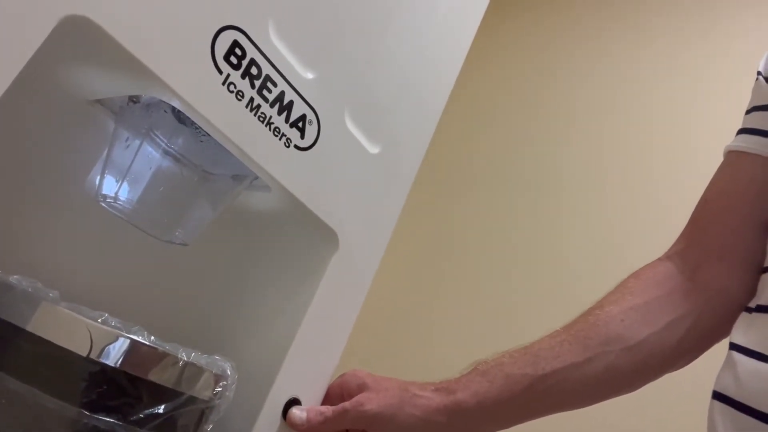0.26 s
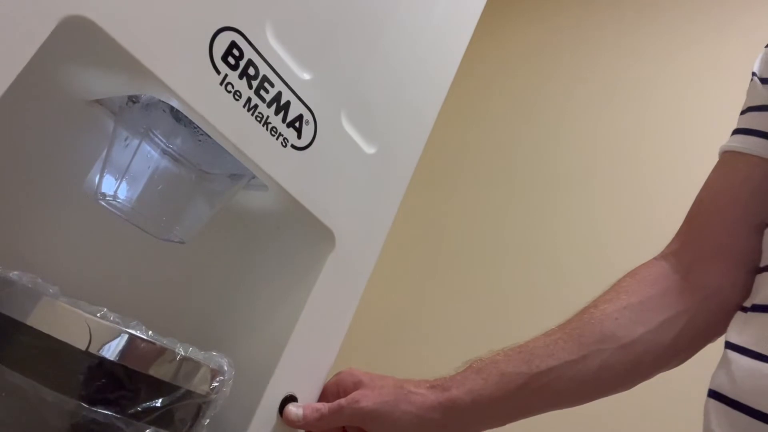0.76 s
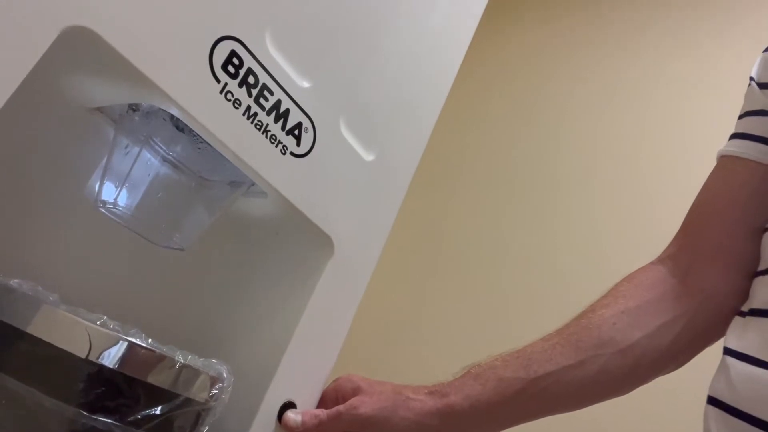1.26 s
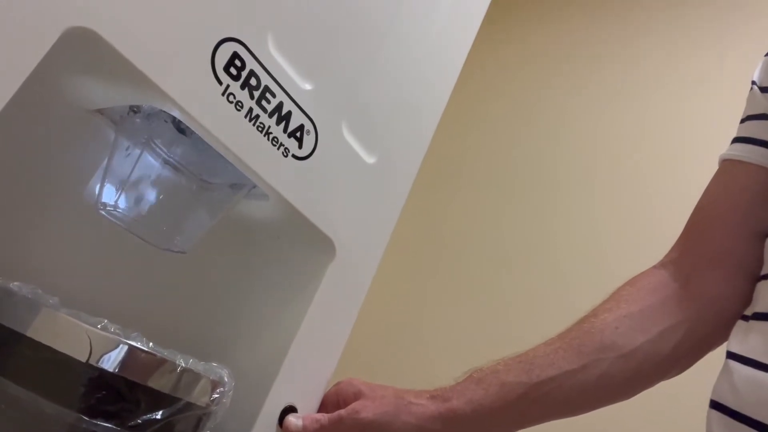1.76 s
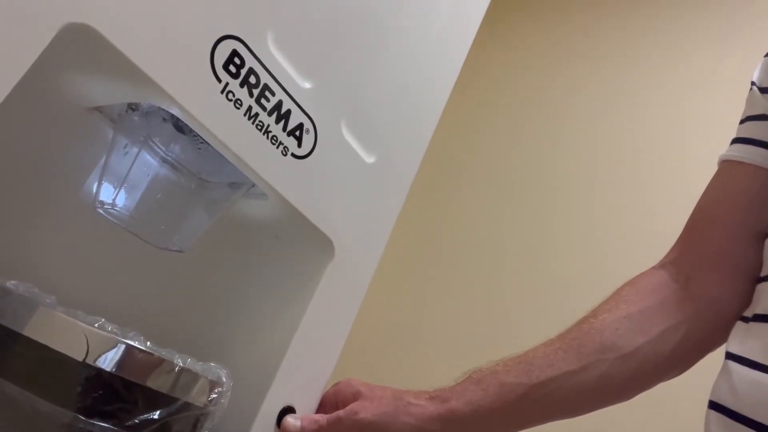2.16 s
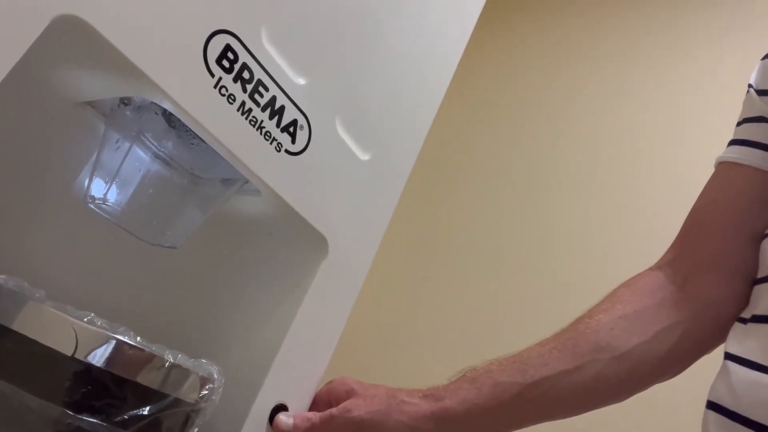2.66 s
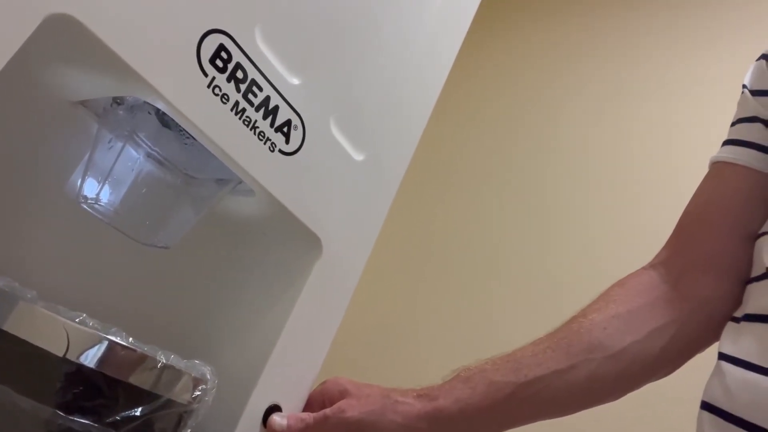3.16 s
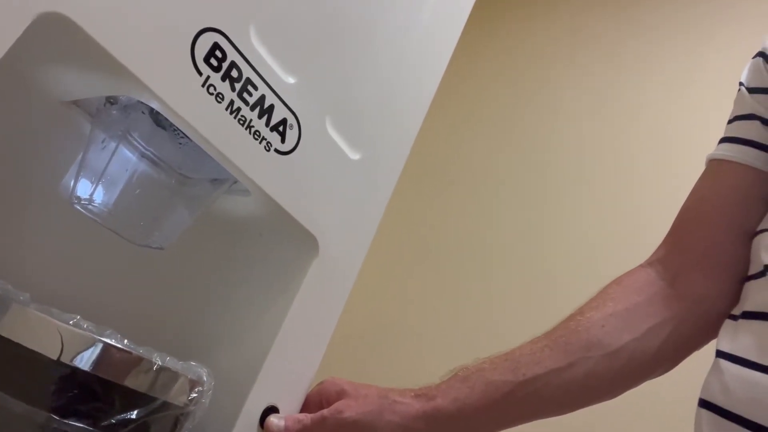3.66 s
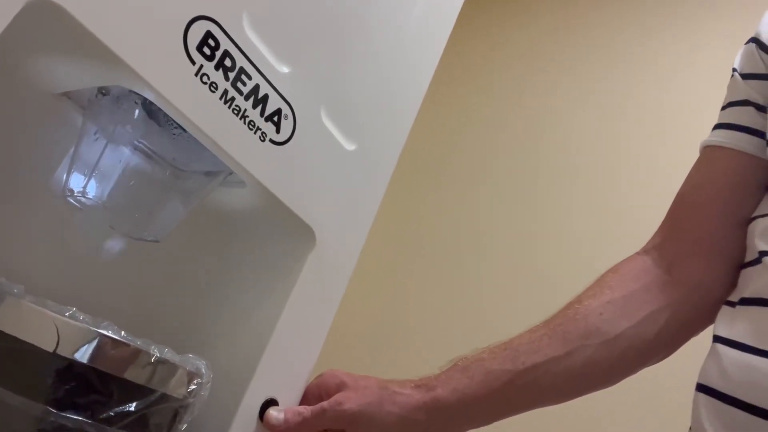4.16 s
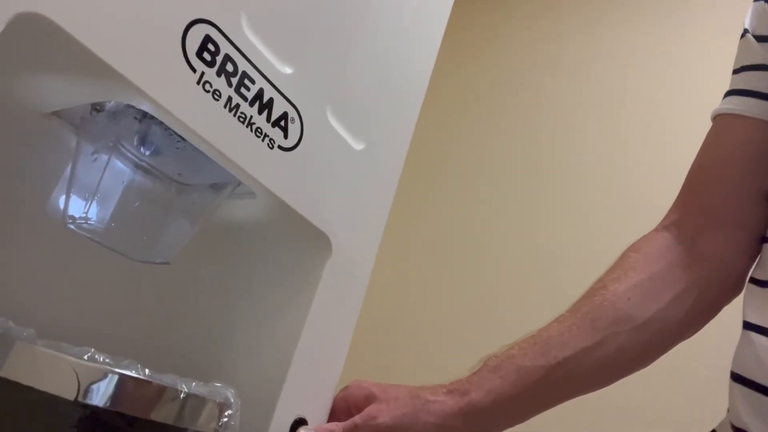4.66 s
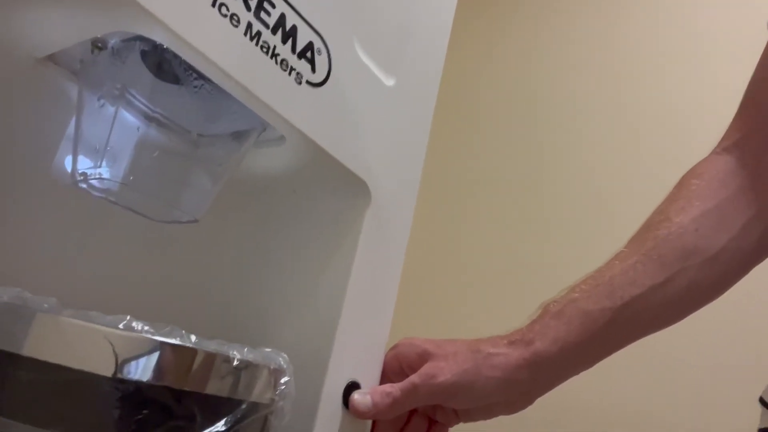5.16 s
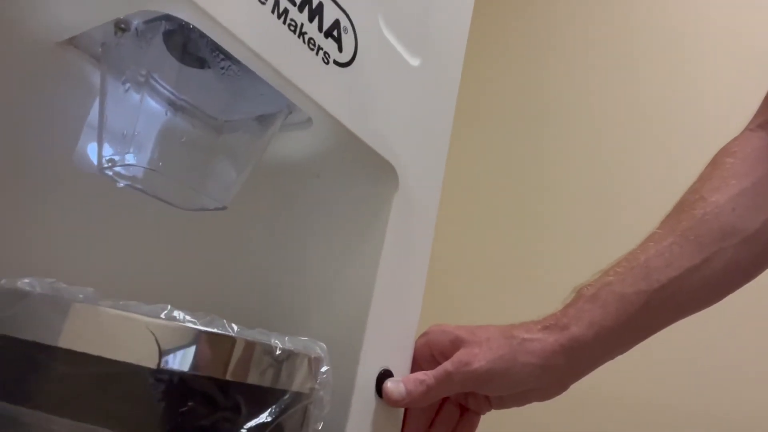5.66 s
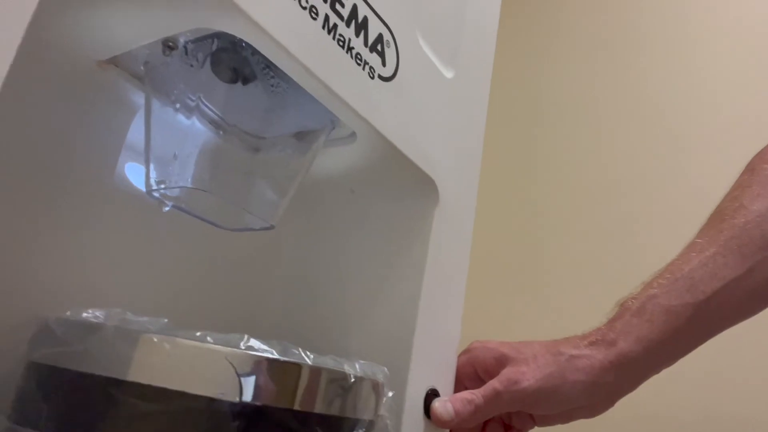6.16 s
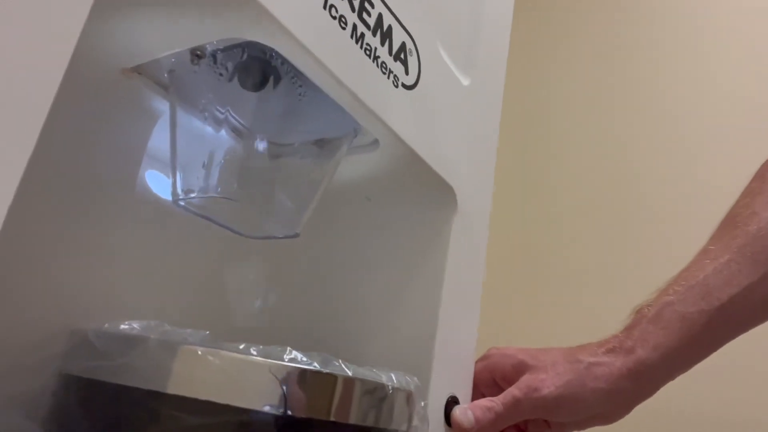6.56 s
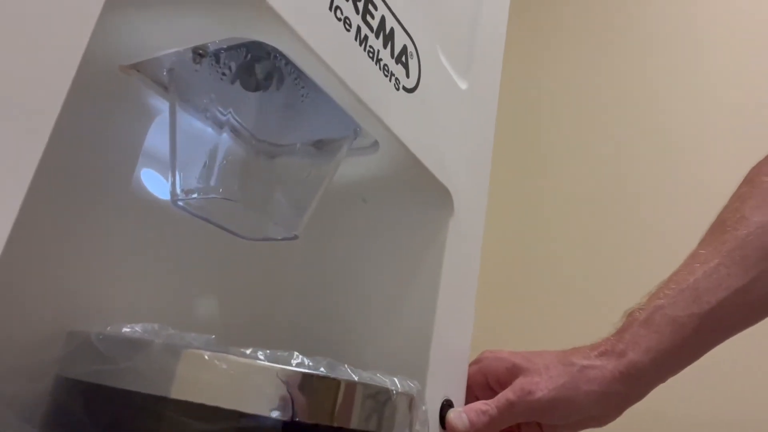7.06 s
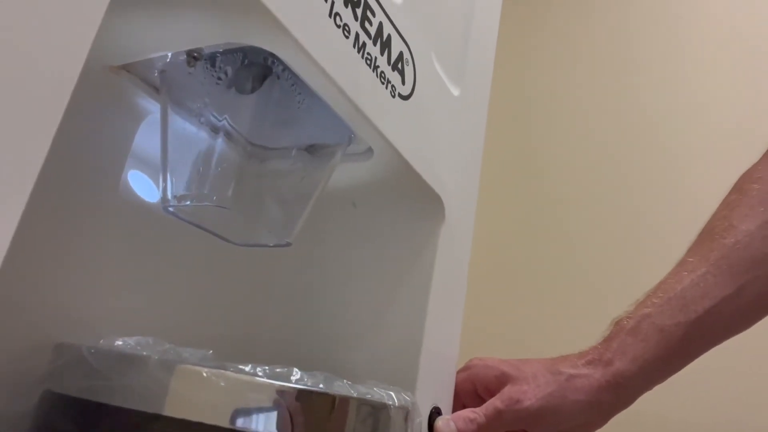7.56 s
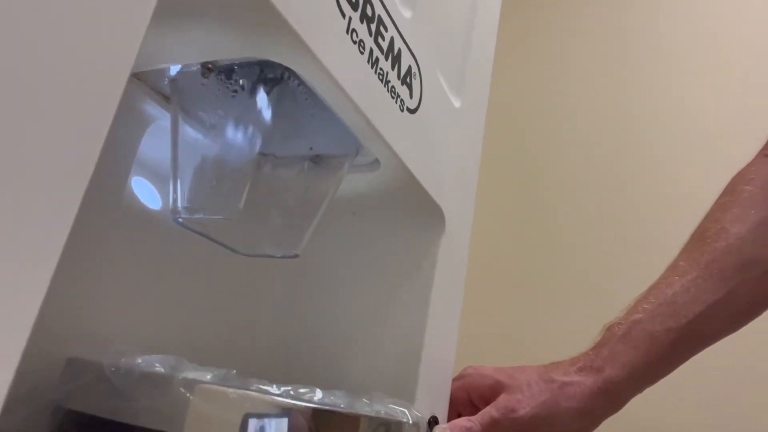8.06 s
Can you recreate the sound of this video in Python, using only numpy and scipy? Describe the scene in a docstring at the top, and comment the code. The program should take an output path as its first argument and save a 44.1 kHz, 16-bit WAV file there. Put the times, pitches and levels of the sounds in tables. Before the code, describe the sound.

A steady low, slightly beating motor hum with soft fan rush runs throughout. At the start a cube slides briefly and knocks lightly at 0.1 s, a faint tick follows, then mostly hum. At 1.1-1.25 s a small cluster of cubes knocks the plastic, and from 1.7 to 2.4 s a dense, loud clatter with grinding and spilling ice thins out to ticks. After a pause, a few hollow knocks come at 3.0-3.3 s. Another sharp, cracking burst with rattling and a deep thump runs 4.05-4.4 s, trailing single cubes until 4.9 s. Faint sliding fills 5-6.3 s. Heavy knocks and a thump hit at 6.45-6.65 s, followed by scattered cubes, a soft spill and chip ticks to 7.7 s. From 7.8 s to the end at about 8.4 s the loudest clatter pours down, slightly overloaded. Close microphone, short corridor tail.

```python
"""Ice cubes drop from a dispenser close to the microphone, in irregular bursts.
They knock down a plastic chute and clatter into a lined bucket: fading rings and short noise bursts.
Cubes also slide, grind and spill, made from many tiny contacts, and small chips tick in between.
A corridor answers with a noise tail. Steady motor hum and fan noise lie behind it all.
The loudest blows are flattened at full scale."""
import sys
import numpy as np
from scipy import signal
from scipy.fft import rfft, irfft, next_fast_len
from scipy.io import wavfile
from scipy.ndimage import map_coordinates

SR = 44100
rng = np.random.default_rng(int(sys.argv[2]) if len(sys.argv) > 2 else 0)


def dump_mix(stems):
    """Bounce the given channels to the path in sys.argv[1] as a 16-bit WAV at rate SR."""
    frames = np.atleast_2d(stems).T  # one column per channel
    limited = np.clip(frames, -1, 1)  # hard clip at full scale
    pcm = np.round(limited * 32767).astype(np.int16)
    wavfile.write(sys.argv[1], SR, pcm)


N = 366449  # length in samples
TOP_HZ = 16000  # band limit

# Every cube rocks back once, more weakly; the scatter is in natural-log units.
REBOUND_S, REBOUND_SCATTER, REBOUND_DB = 0.022, 0.35, -16
# Cube landings: [t/s, level of the blow/dB, level of the ice's sharp crack/dB, aim from 0 = chute to 1 = bucket]
CUBE_LANDINGS = [(0.137, -21, -40, 0.35), (1.117, -26, -28, 0.35), (1.132, -21, -20, 0.17),
                 (1.185, -11, -23.5, .4), (1.249, -30.5, -11.5, .5), (1.699, -14, -21.5, .2),
                 (1.74, -8.5, -16, 0.35), (1.805, -4.5, -18.5, 0.38), (1.874, -20, -13, 0.5),
                 (1.893, -10, -16, 0.5), (1.921, -17, -17, .3), (1.943, -19, -19, .15),
                 (2.079, -8.5, -10.5, .5), (2.138, -22, -14, .1), (2.223, -16.5, -27, 0.1),
                 (2.245, -10, -27, 0.35), (2.403, -23, -24, 0.76), (3.03, -19, -30, .3),
                 (3.06, -6.5, -22, 0.5), (3.13, -17.5, -20, 0.66), (3.32, -29, -33, 0),
                 (4.055, -13, -6, 0.1), (4.094, -13.5, -17.5, .5), (4.175, -12, -13, .3),
                 (4.184, -13, -11, .5), (4.22, -13.5, -14, 0.5), (4.293, -10, -11, .35),
                 (4.48, -32, -16.5, .2), (4.675, -13.5, -31, 0.3), (4.788, -26.5, -15, 0.73),
                 (4.938, -24, -33, .8), (5.952, -36, -24.5, .5), (6.454, -5, -16.5, .1),
                 (6.486, -21, -27, 0.46), (6.507, -5.5, -21, .82), (6.556, -25, -6, .5),
                 (6.624, -21, -20, 0.6), (6.824, -21, -22.5, 0.69), (6.984, -21.5, -31, 0.33),
                 (7.203, -29, -18, 1), (7.788, -5.5, -21, 0.43), (7.82, -16, -10, 0.75),
                 (7.851, -16, -10.5, 0.66), (7.906, -10.5, -12, 0.45), (8.057, -11.5, -21, 0.41),
                 (8.079, -6.5, -19, 0.71), (8.102, -1.5, -16.5, .8), (8.141, -20, -20, 0.42),
                 (8.207, -2, -17.5, 0.47), (8.218, -10, -10, 0.77), (8.299, -13.5, -15.5, 0.7)]


def cubes():
    """Each cube strikes, then rocks back once on the same spot after a short, uneven flight."""
    out = np.zeros((2, N))
    for start, *contact in CUBE_LANDINGS:
        flight = REBOUND_S * np.exp(REBOUND_SCATTER * rng.standard_normal())
        sound = impact(*contact)
        add(out, start, sound)
        add(out, start + flight, amp(REBOUND_DB) * sound)
    return out


THUD_DB = -0.8  # the bucket's ring against its share of the blow
CLACK_SHARE = 0.63  # how far the clack lies from blow (0) to crack (1)
BEND_HZ, BEND_END_HZ, BEND_DB = 2400, 640, -1  # typical start pitch, end pitch, level against the blow
BEND_DELAY_S = 0.0015  # a 1 kHz bending wave reaches the rim this late; lower ones are slower
# The bucket's low ringing tones: [f/Hz, relative level/dB, time to fall 60 dB/s]
BUCKET_TONES = [(357, -19, .16), (498.6, -12, 0.08), (638, 0, 0.068), (705, -1.5, 0.068)]
# The plastic chute's ringing tones: [f/Hz, relative level/dB, time to fall 60 dB/s]
CHUTE_TONES = [(942, -4.5, 0.065), (1130, 1.5, 0.055), (1368, -2, 0.045), (1662, 0.5, 0.04),
               (1776, -1.5, 0.032)]
# Short rings of a hard contact: [f/Hz, relative level/dB, time to fall 60 dB/s]
HARD_TONES = [(2060, 2, 0.056), (2235, 1.5, 0.074), (2963, -4, 0.06), (3670, -4.5, 0.063)]
# Colour of the clack between pieces of ice: [f/Hz, relative level/dB]
CLACK_COLOUR = [(400, -15), (2000, 1), (3500, -.5), (12000, -22)]
# Colour of the sharp crack of the ice: [f/Hz, relative level/dB]
CRACK_COLOUR = [(500, -25), (4000, -4), (5800, 6), (7500, 0), (12300, -5.5), (16000, -10.5)]


def impact(blow_db, crack_db, aim):
    """One contact shares its blow between bucket and chute, and clacks and cracks against other ice."""
    t = np.arange(SR // 13) / SR
    angle = np.pi / 2 * np.clip(aim, 0, 1)
    bucket = np.sqrt(2) * amp(blow_db) * np.sin(angle)
    chute = np.sqrt(2) * amp(blow_db) * np.cos(angle)
    thud = ring(BUCKET_TONES, t, attack=0.0021, scatter_db=3, detune=0.018, delay=BEND_DELAY_S)
    thud = bucket * amp(THUD_DB) * thud
    knock = ring(CHUTE_TONES, t, attack=0.0018, scatter_db=5, detune=0.02, delay=BEND_DELAY_S)
    knock = chute * amp(-0.5) * knock

    # the cube chatters on the plastic as it lands, which roughens the knock
    chatter_colour = [(250, -22), (900, 1), (1700, 2), (4000, -38)]  # f/Hz, relative level/dB
    chatter = chute * amp(0.5) * burst(chatter_colour, t, t60=0.05, attack=0.0019)

    clack_db = blow_db + CLACK_SHARE * (crack_db - blow_db)
    clack = amp(clack_db - 5) * ring(HARD_TONES, t, attack=0.0011, scatter_db=4.5, detune=0.012)
    clack = clack + amp(clack_db + 10.5) * burst(CLACK_COLOUR, t, t60=0.043, attack=0.0013)
    crack = amp(crack_db + 10) * burst(CRACK_COLOUR, t, t60=0.024, attack=0.0016)

    # every cube has its own size, and so its own four brief, high rings
    pitches = 5000 * np.exp(0.203 * rng.standard_normal(size=4))
    own_tones = [(hz, 0, 0.018) for hz in pitches]
    clink = amp(crack_db - 6.5) * ring(own_tones, t, attack=0.00078, scatter_db=0.5, detune=0)

    # the blow also sends a bending wave of falling pitch through the plastic
    bend_start_hz = BEND_HZ * np.exp(0.2 * rng.standard_normal())
    flex = amp(blow_db + BEND_DB) * bend(t, bend_start_hz, BEND_END_HZ)

    sound = chatter + clack + crack
    add(sound[0], 0, thud + knock + flex + clink)  # these sit in the first of the two signals only
    return sound


def ring(modes, t, attack, scatter_db, detune, delay=0):
    """A struck body rings in fading tones; strengths and pitches vary with the spot that is hit."""
    hz, db, t60 = np.transpose(modes)[:, :, None]
    size, shift, phase = rng.standard_normal((3, len(modes), 1))
    age = np.maximum(t - delay * (1000 / hz) ** 2, 0)  # in a thin wall low tones start later
    waves = np.sin(2 * np.pi * (hz * (1 + detune * shift) * t + phase))
    fade = amp(db + scatter_db * size - 60 * age / t60)
    sound = np.sum(fade * waves * (1 - np.exp(-age / attack)), axis=0)
    return sound / np.std(sound[:SR // 50])


def burst(spectrum, t, t60, attack):
    """Dense, quickly fading vibration: coloured noise with a fast rise and a steady fall in dB."""
    noise = coloured(rng.standard_normal((2, len(t))), spectrum)
    return noise * amp(-60 * t / t60) * (1 - np.exp(-t / attack))


BEND_FALL_S, BEND_PEAK_S = 0.004, 0.0045  # speed of the pitch fall, time of the loudest moment


def bend(t, start_hz, end_hz):
    """High bending waves outrun low ones, so a struck wall falls quickly in pitch."""
    hz = end_hz + (start_hz - end_hz) * np.exp(-t / BEND_FALL_S)
    swell = t / BEND_PEAK_S * np.exp(1 - t / BEND_PEAK_S)
    return np.sin(2 * np.pi * np.cumsum(hz) / SR) * swell


THUMP_HZ, THUMP_END_HZ = 1200, 200  # pitch at the start and end of the fall
# Heavy landings: [t/s, level/dB]
HEAVY_LANDINGS = [(3.173, -17), (4.221, -7), (6.563, -9), (6.825, -12.5)]


def thumps():
    """A heavy landing flexes the bucket's wall with a deep, falling thump."""
    out = np.zeros((2, N))
    sound = bend(np.arange(SR // 13) / SR, THUMP_HZ, THUMP_END_HZ)
    for start, db in HEAVY_LANDINGS:
        add(out[0], start, amp(db) * sound)
    return out


RATTLE_T60_S = 0.015  # time for each contact's ring to fall 60 dB
# Cubes grinding together: [t/s, length/s, centre f/Hz, spread of pitches/octaves, level/dB]
GRINDING_RUNS = [(1.912, .11, 2550, .32, -12.5), (4.185, .08, 2170, .22, -16.5),
                 (4.305, .12, 2250, .28, -18.5), (4.612, .06, 2050, .25, -26),
                 (6.585, .125, 2200, .3, -20.5)]


def rattles(count=110):
    """Grinding cubes touch in quick succession, then less often; each contact rings at its own pitch."""
    out, t = np.zeros((2, N)), np.arange(SR // 25) / SR
    fade = amp(-60 * t / RATTLE_T60_S)
    for start, length, hz, octaves, db in GRINDING_RUNS:
        run = np.zeros((2, round(length * SR) + len(t)))
        times = length * rng.beta(1.4, 2, count)
        pitches = hz * 2 ** (octaves * rng.standard_normal(count))
        for k, (when, pitch) in enumerate(zip(times, pitches)):
            add(run[k % 2], when, np.sin(2 * np.pi * pitch * t) * fade)
        add(out, start, amp(db) * unit(run))
    return out


SKID_S, SKID_HZ, SKID_DB = 0.0296, 1730, -18.5  # skid before a landing: length, pitch, level against blow
# Cubes sliding and rubbing as the auger pushes them: [t/s, length/s, centre f/Hz, level/dB]
CUBE_SLIDES = [(0, .055, 1700, -21.5), (0.135, .1, 1300, -24.5), (0.6, .25, 1600, -33),
               (0.95, 0.13, 1500, -25), (1.59, .1, 850, -26), (2.69, .26, 2200, -32), (3.58, .1, 2200, -28),
               (3.965, 0.054, 1190, -23), (5.02, .3, 2200, -36), (5.405, 0.17, 1000, -28),
               (6.261, 0.16, 1200, -26.5), (7.58, .12, 1100, -30)]


def slides():
    """A sliding cube stutters over the plastic in one band; every cube skids just before it lands."""
    out, rub = np.zeros((2, N)), grit(rate=440, spread_db=2.2, t60=0.021)
    skids = [(s - SKID_S, SKID_S, SKID_HZ, blow_db + SKID_DB) for s, blow_db, _, _ in CUBE_LANDINGS]
    for start, length, hz, db in list(CUBE_SLIDES) + skids:
        stroke = rub[:, round(start * SR):][:, :round(length * SR)]
        stroke = coloured(stroke, [(hz / 6, -17), (hz, 0), (hz * 6, -37)])
        add(out, start, amp(db) * stroke * signal.windows.tukey(stroke.shape[1], 0.5))
    return out


# A spill gathers and dies away at fixed speeds, over ice that never quite rests.
GATHER_DB_PER_S, SETTLE_DB_PER_S, RESTING_DB = 58, 42, -41
STIR_DB = 1.8  # how unevenly the auger stirs the resting ice
# Heaps of loose ice giving way: [t/s, length/s, level/dB]
ICE_SPILLS = [(1.03, 0.1, -25.5), (1.879, 0.27, -17.7), (4.204, 0.11, -19.5), (6.48, 0.07, -23),
              (7.013, 0.24, -27.5), (7.9, .06, -25.5), (8.15, 0.17, -19.5)]
# Colour of the loose ice: [f/Hz, relative level/dB]
LOOSE_COLOUR = [(150, -15), (370, 6), (1500, 1), (2300, 0), (6000, -12), (16000, -28)]


def tumble():
    """Each spill gathers, runs and settles: many small collisions of loose ice."""
    t = np.arange(N) / SR
    power = amp(RESTING_DB + STIR_DB * wobble(7)) ** 2
    for start, length, db in ICE_SPILLS:
        gather_db = GATHER_DB_PER_S * np.maximum(start - t, 0)
        settle_db = SETTLE_DB_PER_S * np.maximum(t - start - length, 0)
        power = power + amp(db - gather_db - settle_db) ** 2
    return np.sqrt(power) * coloured(grit(rate=210, spread_db=3.1, t60=0.034), LOOSE_COLOUR)


def grit(rate, spread_db, t60):
    """Brief random contacts of uneven size, rate a second, each opening two noises for a moment."""
    t = np.arange(SR // 20) / SR
    sizes = amp(spread_db * np.minimum(rng.exponential(size=N), 3))
    hits = (rng.random(N) < rate / SR) * sizes
    envelope = signal.oaconvolve(hits, amp(-60 * t / t60))[:N]
    return unit(envelope * rng.standard_normal((2, N)))


# Small chips ticking on the chute: [t/s, level/dB]
CHIP_TICKS = [(0.302, -18.5), (1.117, -3), (1.717, -12), (1.913, -1), (1.979, -8), (2.315, -15),
              (3.555, -16), (4.116, -12), (4.217, -4), (4.35, -10), (6.368, -10.5), (6.666, -12),
              (6.861, -12), (7.051, -16), (7.081, -13.5), (7.285, -3), (7.44, -11.5), (7.525, -12.5),
              (7.711, -16.5)]
# Typical colour of a chip: [f/Hz, relative level/dB]
CHIP_COLOUR = [(1000, -2.5), (6000, 1.5), (13000, -2)]


def chips(colour_db=2.5):
    """Splinters of ice tick thinly on the chute, each with its own colour."""
    out, t = np.zeros((2, N)), np.arange(SR // 10) / SR
    pitches = np.geomspace(CHIP_COLOUR[0][0], TOP_HZ, 14)
    for start, db in CHIP_TICKS:
        colour = [(hz, along(CHIP_COLOUR, hz) + colour_db * rng.standard_normal()) for hz in pitches]
        add(out, start, amp(db) * burst(colour, t, t60=0.036, attack=0.00062))
    return out


# How long the corridor rings: [f/Hz, time to fall 60 dB/s]
CORRIDOR_FADE = [(2000, 0.46), (6000, 0.4), (14000, 0.26)]


def corridor(x):
    """A diffuse tail, new every quarter second as the ice moves; each frequency dies at its own speed."""
    out, step = np.zeros((2, N)), SR // 4
    for start in range(0, N, step):
        hz, t, grid = signal.stft(rng.standard_normal((2, SR // 2)), SR, nperseg=256)
        fade = amp(-60 * t / along(CORRIDOR_FADE, hz)[:, None])
        tail = signal.istft(grid * fade, SR, nperseg=256)[1]
        age = np.arange(tail.shape[1]) / SR
        tail = tail * (1 - np.exp(-(age / 0.0095) ** 2))  # soft start
        tail = tail / np.linalg.norm(tail[0])
        add(out, start / SR, signal.fftconvolve(x[None, start:start + step], tail, axes=1))
    return out


# Motor and mains tones, and a thin whine: [f/Hz, typical peak level/dB]
HUM_TONES = [(99.8, -29.5), (112.5, -27), (224.8, -38.5), (254.8, -26.5), (299.6, -39.5), (5400, -53.5)]
# Colour of the cooling fan's rush: [f/Hz, relative level/dB]
FAN_COLOUR = [(20, -24.5), (80, -5.5), (105, -1.5), (148, 2), (187, -14.5), (222, -2.5), (450, -9.5),
              (2000, -20.5), (7000, -33), (16000, -47.5)]


def machine():
    """Compressor and auger motor hum in unsteady tones that beat together, over the cooling fan's rush."""
    t, drift = np.arange(N) / SR, wobble(2.7)
    hum = np.zeros(N)
    for hz, db in HUM_TONES:
        level = amp(db + 0.85 * wobble(5))
        turns = hz * t + rng.random()
        hum += level * np.sin(2 * np.pi * turns + hz / 600 * drift)
    fan = ports(coloured(rng.standard_normal((2, N)), FAN_COLOUR))
    return hum + amp(-25.8) * fan


# Likeness of the two microphone ports: [f/Hz, likeness from -1 to 1]
PORT_LIKENESS = [(280, 0.99), (600, 0.15), (2000, .55), (4000, 0.5), (7000, 1)]


def ports(pair):
    """Two unrelated signals, as sum and difference, become partly alike left and right channels."""
    def shares(hz):
        alike = np.clip(along(PORT_LIKENESS, hz), -1, 1)
        return np.sqrt(np.array([1 + alike, 1 - alike]) / 2)
    mid, side = filtered(pair, shares)
    return np.array([mid + side, mid - side])


def amp(db):
    """Decibels to a plain factor."""
    return 10 ** (np.asarray(db) / 20)


def unit(x):
    """Scale x to an rms of 1."""
    return x / np.sqrt(np.mean(x ** 2) + 1e-20)


def along(points, hz):
    """Read a curve of (f/Hz, value) points on a log frequency axis."""
    f, v = np.transpose(points)
    return np.interp(np.log(hz + 1), np.log(f + 1), v)


def wobble(rate):
    """A smooth random curve, rate knots a second."""
    knots = rng.standard_normal(int(N * rate / SR) + 4)
    steps = np.arange(0, N, 200)
    return np.interp(np.arange(N), steps, map_coordinates(knots, [steps * rate / SR]))


def filtered(x, response):
    """x times a real or complex response of frequency."""
    n = x.shape[-1]
    m = next_fast_len(n + 2048, real=True)
    return irfft(rfft(x, m) * response(np.fft.rfftfreq(m, 1 / SR)), m)[..., :n]


def coloured(x, spectrum):
    """x shaped by a spectrum, at rms 1."""
    return unit(filtered(x, lambda hz: amp(along(spectrum, hz))))


def add(track, s, sound):
    """Mix a sound into a track at a time in seconds."""
    part = track[..., max(round(s * SR), 0):][..., :sound.shape[-1]]
    part += sound[..., :part.shape[-1]]


# Level of the ice, left against right: [f/Hz, level/dB]
LEFT_LEVEL = [(200, 2), (650, 7.5), (1600, -0.5)]
# How far the left channel leads: [f/Hz, phase/radians]
LEFT_LEAD = [(300, 0), (650, .3), (1380, -2), (3000, -1.1), (5000, 1.3), (9000, 3.14), (14000, 6.2)]


def scene():
    """The corridor answers the ice; the chute lies off to the left, so the two ports differ."""
    sides = np.array([[0.5], [-0.5]])  # half of each difference to the left, half to the right
    ice = cubes() + chips() + slides() + rattles() + thumps() + tumble()
    ice = ports(ice + amp(-8.0) * corridor(ice[0]))
    ice = filtered(ice, lambda hz: amp(sides * along(LEFT_LEVEL, hz)))
    # the machine shares the ice's phase difference, but not its level difference
    return filtered(ice + machine(), lambda hz: np.exp(1j * sides * along(LEFT_LEAD, hz)))


def record(dry, hardness=7):
    """Loud blows flatten at full scale; nothing is kept above the band limit."""
    clipped = dry / (1 + np.abs(dry) ** hardness) ** (1 / hardness)
    return filtered(clipped, lambda hz: hz < TOP_HZ)


dry = scene()
out = record(dry)
dump_mix(out)
```